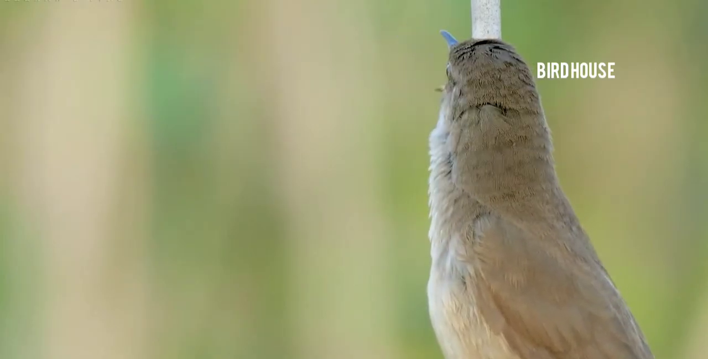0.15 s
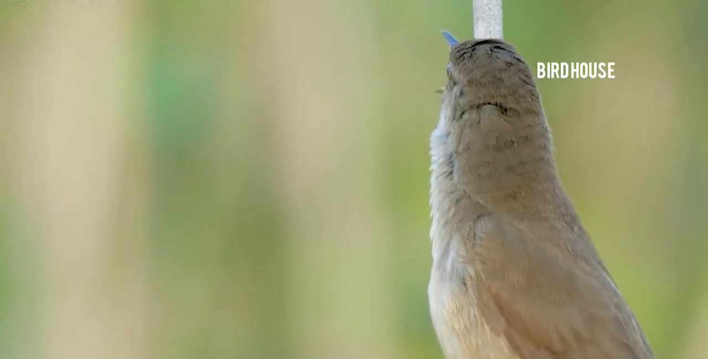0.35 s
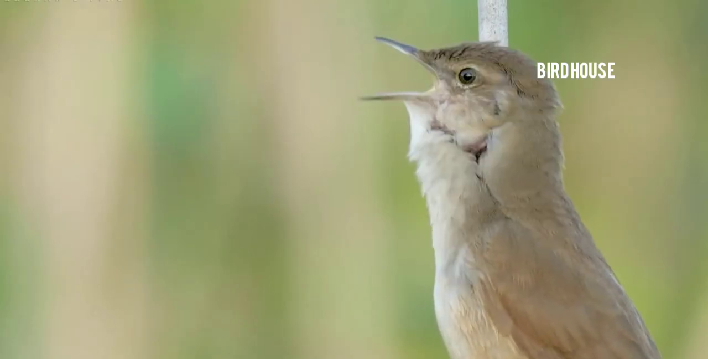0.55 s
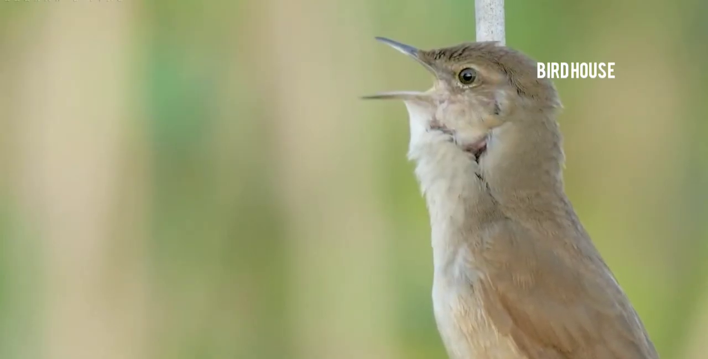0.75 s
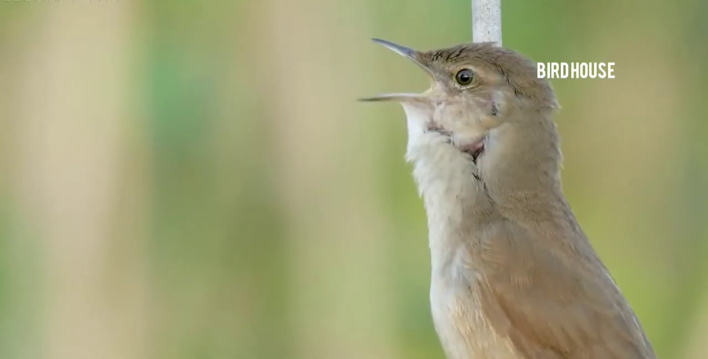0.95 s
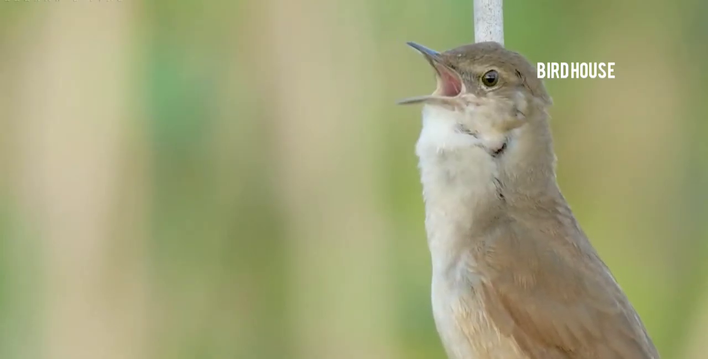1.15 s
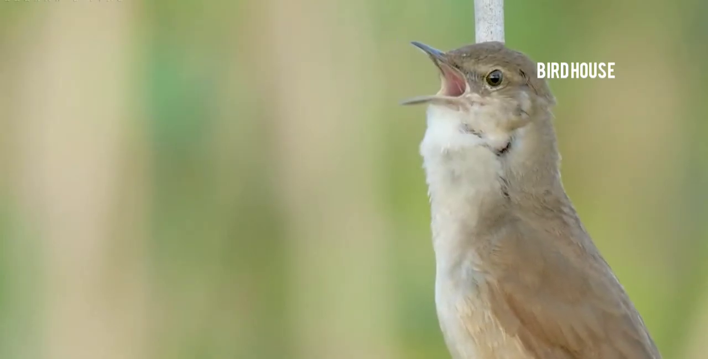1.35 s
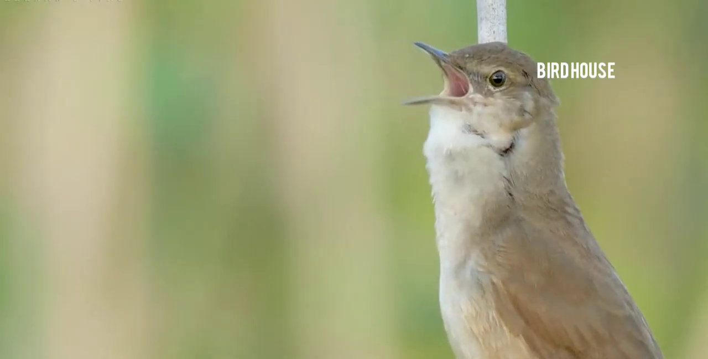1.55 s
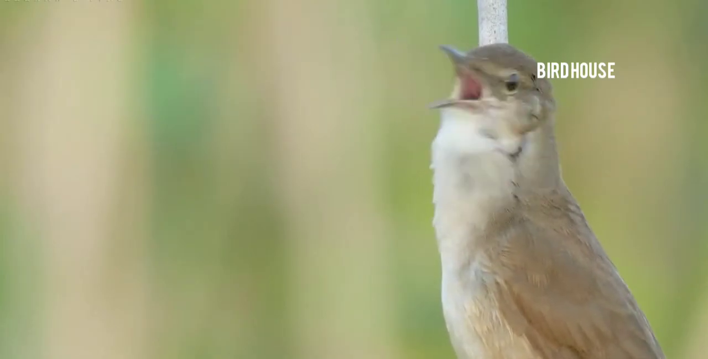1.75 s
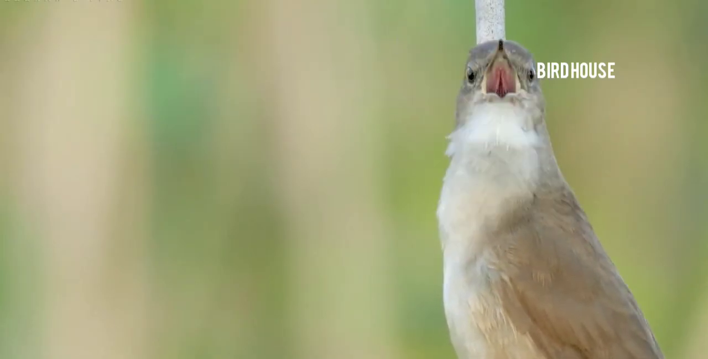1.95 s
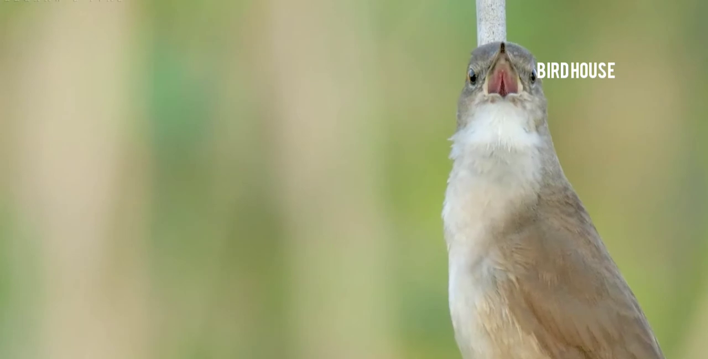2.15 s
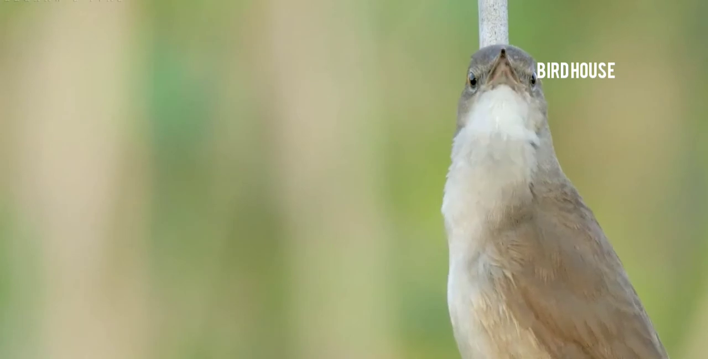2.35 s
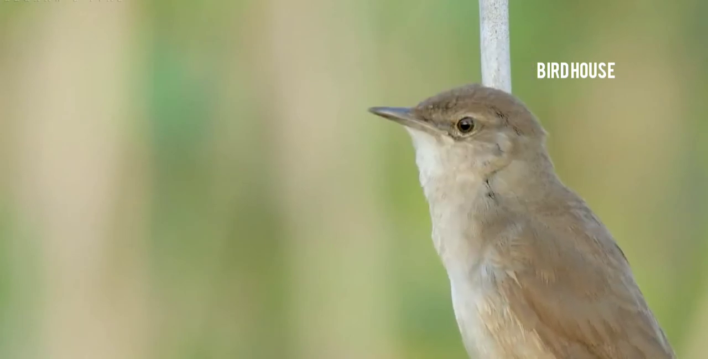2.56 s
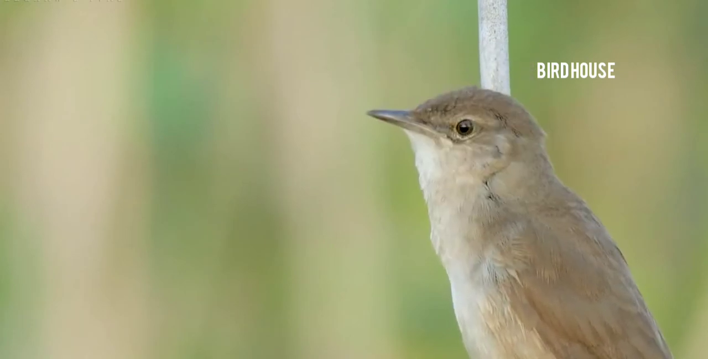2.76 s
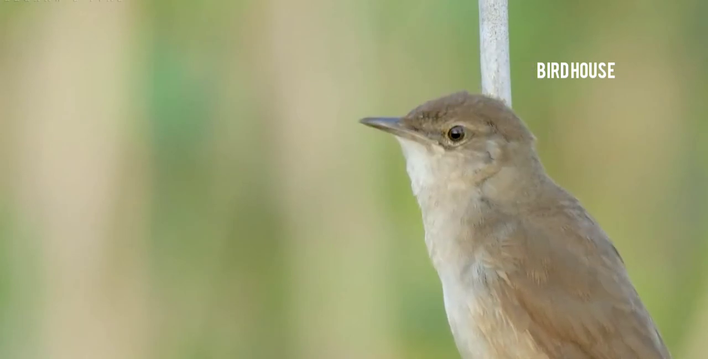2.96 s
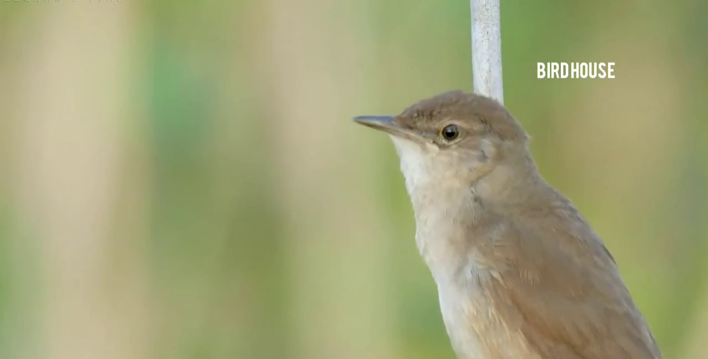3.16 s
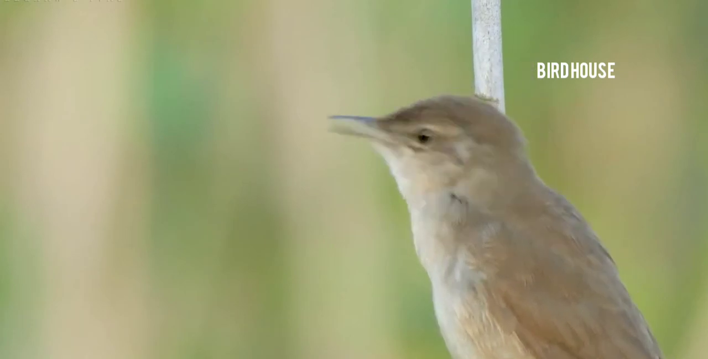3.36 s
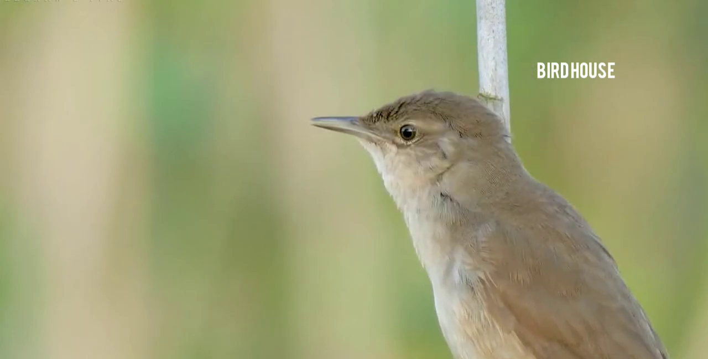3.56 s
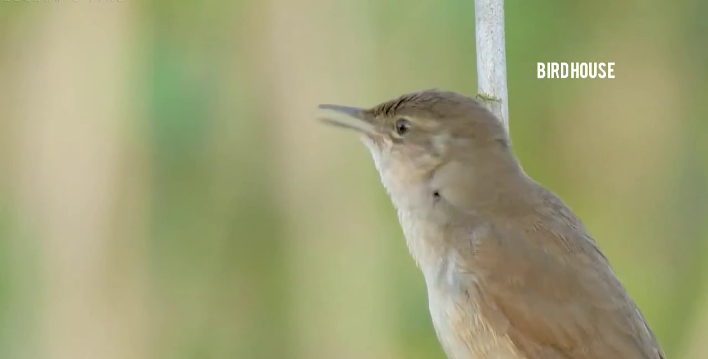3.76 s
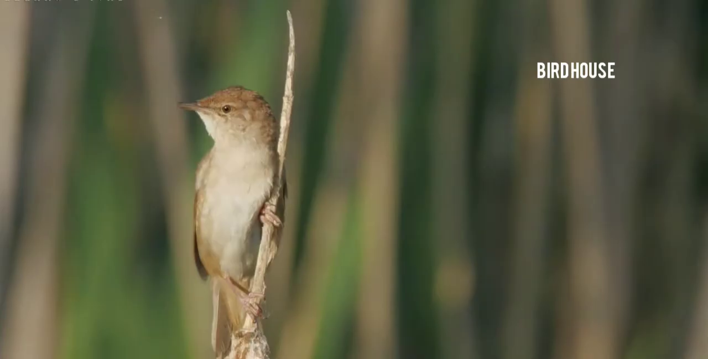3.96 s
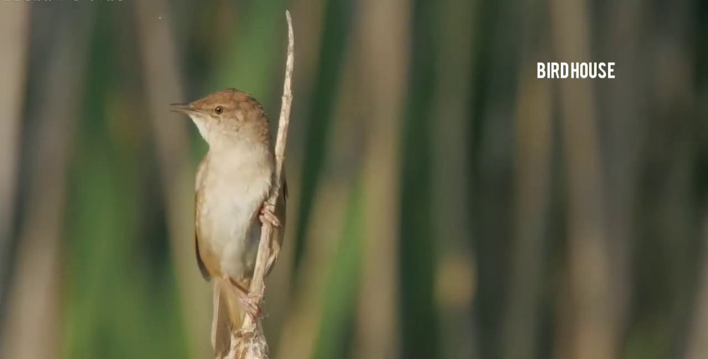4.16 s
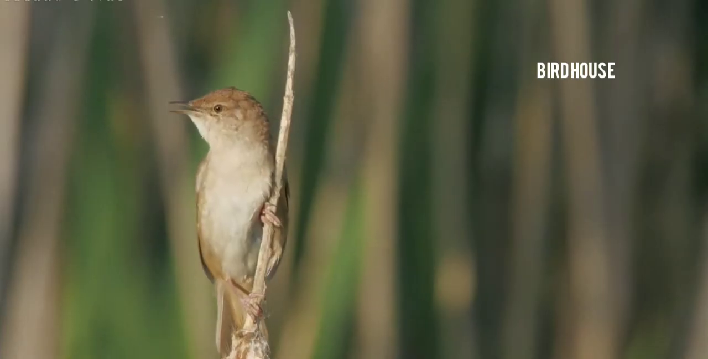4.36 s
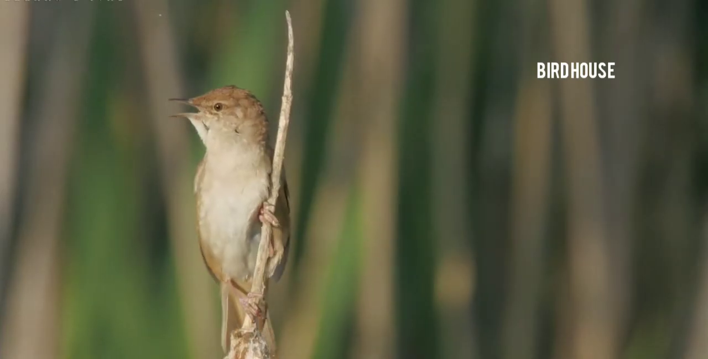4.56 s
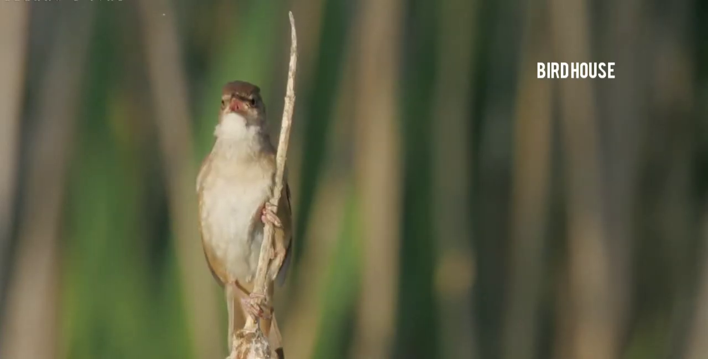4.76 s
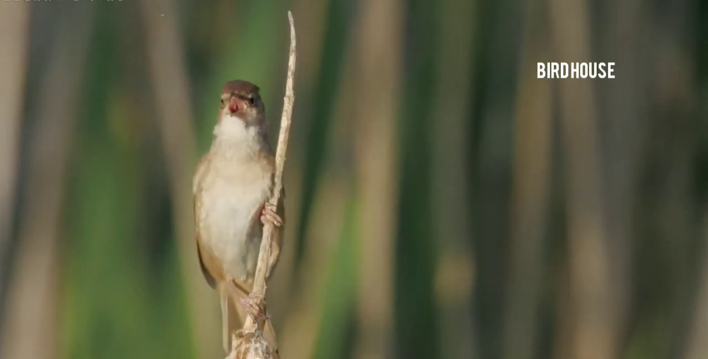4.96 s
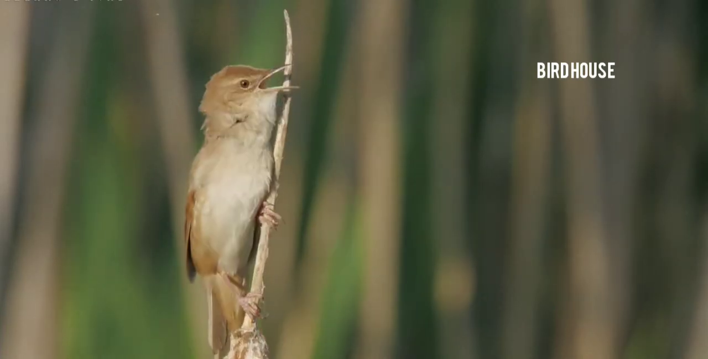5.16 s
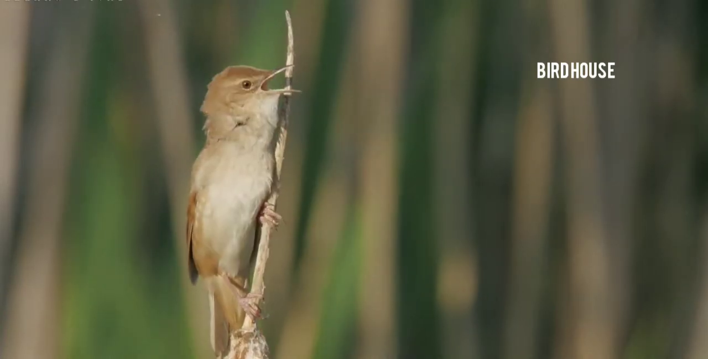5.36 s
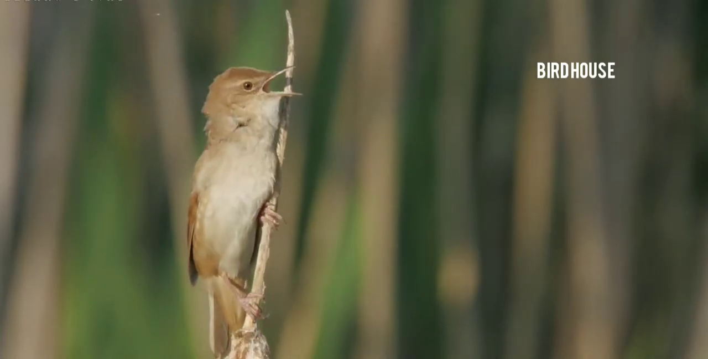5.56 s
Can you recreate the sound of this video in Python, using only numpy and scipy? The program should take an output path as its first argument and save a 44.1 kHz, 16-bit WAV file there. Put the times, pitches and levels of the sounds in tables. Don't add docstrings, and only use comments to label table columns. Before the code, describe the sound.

A small bird close to the microphone reels a steady, high, ticking trill, about fifty syllables a second, then stops at 2.4 seconds. Behind it frogs croak and chuckle; in the pause, small birds whistle and buzz and a dry stem snaps. A fainter reel then starts and swells. Outdoor marsh, soft hiss, stereo, short reedy haze.

```python
import sys
import numpy as np
from scipy import signal
from scipy.fft import rfft, irfft, next_fast_len
from scipy.io import wavfile
from scipy.ndimage import uniform_filter1d

SR = 44100
rng = np.random.default_rng(int(sys.argv[2]) if len(sys.argv) > 2 else 0)


def decibels_to_gain(level_db):
    exponent = np.asarray(level_db, float) / 20
    return 10 ** exponent


def put_to_file(sound):
    columns = np.atleast_2d(sound).T
    safe = np.clip(columns, -1, 1)
    whole_steps = np.round(safe * 32767)
    wavfile.write(sys.argv[1], SR, whole_steps.astype(np.int16))


N = 251370


def evened(x):
    return x / np.sqrt(np.mean(x ** 2) + 1e-20)


def smooth_noise(count, size):
    return evened(uniform_filter1d(rng.standard_normal(count), size))


def read(points, hz):
    f, value = np.transpose(points)
    return np.interp(np.log(hz + 1), np.log(f + 1), value)


def along(rows, t):
    s, *columns = np.transpose(rows)
    return [np.interp(t, s, c) for c in columns]


def add(mix, s, sound):
    part = mix[..., max(round(s * SR), 0):][..., :sound.shape[-1]]
    part += sound[..., :part.shape[-1]]


def placed(x, pan_db):
    return np.array([x * decibels_to_gain(pan_db / 2), x * decibels_to_gain(-pan_db / 2)])


def passed(x, order, hz, kind="bandpass", run=signal.sosfilt):
    return run(signal.butter(order, hz, kind, fs=SR, output="sos"), x)


def resonate(x, hz, width_hz):
    turn = np.exp(2j * np.pi * np.cumsum(hz * np.ones(len(x))) / SR)
    r = np.exp(-np.pi * width_hz / SR)
    return 2 * (turn * signal.lfilter([(1 - r) ** 2], [1, -2 * r, r * r], x / turn + 1e-18)).real


def blip(ms, peak_ms, start_hz, end_hz, rise_ms, fall_ms, db):
    u = ms - peak_ms
    rising = np.exp(-(u / rise_ms) ** 2)
    falling = np.exp(-(abs(u) / fall_ms) ** 1.2)
    shape = decibels_to_gain(db) * np.where(u < 0, rising, falling)
    hz = start_hz + (end_hz - start_hz) / (1 + np.exp(-np.clip(0.83 * u / rise_ms, -30, 30)))
    return 2 * np.pi * np.cumsum(hz) / SR, shape


def reeds(x, t60_s, first_ms):
    taps = np.zeros((2, SR // 2))
    at = np.arange(0, SR // 2 - 20, 20) + rng.integers(0, 20, (2, SR // 40))
    np.put_along_axis(taps, at, rng.choice([-1., 1.], at.shape), 1)
    t = np.arange(SR // 2) / SR
    taps *= decibels_to_gain(-60 * t / t60_s) * np.clip(t * 1000 / first_ms, 0, 1)
    return signal.fftconvolve(x, taps / np.linalg.norm(taps[0]), axes=1)[:, :N]


# (time [s], level [dB])
MURMUR = [(0, -43.5), (.3, -71), (.55, -40.5), (1.2, -42.5), (1.95, -54), (2.3, -34.5), (3.4, -55),
          (3.9, -45.5), (4.55, -60.5), (5.35, -39), (5.7, -49)]
SWELL_DB_PER_S, CUT_DB_PER_S = 192, 388
LOW_MURMUR_DB = -10.5


def calls_db(rows, t, murmur_db):
    start, length, level = np.array(rows)[:, :3, None].swapaxes(0, 1)
    early, late = start - t, t - start - length
    db = level - SWELL_DB_PER_S * np.maximum(early, 0) - CUT_DB_PER_S * np.maximum(late, 0)
    return np.maximum(db.max(0), along(MURMUR, t)[0] + murmur_db)


# (frequency [Hz], density [dB])
AIR_SPECTRUM = [(18, -64), (30, -62), (81, -29), (100, -26), (130, -26), (200, -27), (352, -26.5),
                (521, -18), (1030, -11), (1300, -5), (2200, 0.5), (3260, -4.5), (5500, -11), (11000, -19),
                (15000, -21)]
# (frequency [Hz], correlation [0-1])
AIR_LIKENESS = [(60, 1), (180, 0.92), (550, 1), (1650, 0.7), (4970, 0.71), (10000, 0.93), (11500, 0.39),
                (15000, 0.25)]
# (time [s], level [dB])
RUSH_LULL = [(0, 1.5), (3.65, 1.5), (3.75, -6), (5.3, -0.5), (5.7, 1)]
AIR_DB, RUSH_SHARE = -37, 0.33
TOP_LEFT_DB = 2


def air():
    frames, hz = N // 256 + 5, np.fft.rfftfreq(1024, 1 / SR)
    f = hz[:, None]
    a, b, c, d, patches = rng.standard_normal((frames, 513, 5)).T
    patches = evened(uniform_filter1d(uniform_filter1d(patches, 12, 0), 10, 1))
    patch_db = (1.1 + 1.5 / (1 + (f / 4000) ** 4)) * patches
    same, left = np.clip(read(AIR_LIKENESS, hz), -1, 1)[:, None], a + 1j * b
    z = np.array([left, same * left + np.sqrt(1 - same ** 2) * (c + 1j * d)])
    z *= decibels_to_gain(read(AIR_SPECTRUM, hz)[:, None] + patch_db)
    level = decibels_to_gain(AIR_DB - 11.5) / np.std(signal.istft(z, nperseg=1024, noverlap=768)[1])

    t = np.arange(frames) * 256 / SR
    croak_db = calls_db(CROAK_LOW, t - .012, LOW_MURMUR_DB)
    swell_db = RUSH_SHARE * (croak_db + 54.5) + along(RUSH_LULL, t)[0]
    low = 1 / (1 + (f / 1100) ** 4) / (1 + (360 / (f + 1)) ** 8)
    z *= decibels_to_gain(low * swell_db)
    z *= decibels_to_gain(np.multiply.outer([.5, -.5], TOP_LEFT_DB * (hz > 11000)))[..., None]
    return level * signal.istft(z, nperseg=1024, noverlap=768)[1][:, :N]


def note(s, length_s, start_hz, middle_hz, end_hz, db, warble=0, per_s=0):
    u = np.linspace(0, 1, max(round(length_s * SR), 99))
    hz = np.polyval(np.polyfit([0, .5, 1], [start_hz, middle_hz, end_hz], 2), u)
    beat = np.cos(2 * np.pi * per_s * length_s * u)
    waver = smooth_noise(N // 8, 200)[:len(u)]
    tone = np.sin(2 * np.pi * np.cumsum(hz * (1 + warble * beat + 0.006 * waver)) / SR)
    chop = 1 + np.sign(warble) * .6 * beat
    return s, decibels_to_gain(db + 8 + 1.2 * waver) * tone * chop * signal.windows.tukey(len(u), .4)


# (time [s], level [dB])
FLOCK_LEVEL = [(0, -53), (2.4, -50), (2.75, -48.5), (2.85, -52), (3.0, -49.5), (3.5, -49.5), (3.75, -54),
               (3.97, -50.5), (4.07, -59), (4.3, -58), (4.37, -54), (4.5, -59), (5.7, -56)]


def flock():
    out, ms = np.zeros((2, N)), np.arange(600) * 1000 / SR
    for s, length, height, slide, side, size in rng.random((1500, 6)):
        hz = 2500 + 2400 * height
        end_hz = hz * (1 + .3 * (slide - .55))
        turn, shape = blip(ms, 5, hz, end_hz, .7 + 2 * length, 1.2 + 6 * length, 3 * size)
        add(out, s * N / SR, placed(shape * np.sin(turn), 8 * (side - .5)))
    out = .4 * out + reeds(out, t60_s=.3, first_ms=2)
    return decibels_to_gain(along(FLOCK_LEVEL, np.arange(N) / SR)[0]) * evened(out)


# (start [s], length [s], start pitch [Hz], end pitch [Hz], level [dB])
LATE_WHISTLES = [(2.691, 0.32, 4000, 3964, -56), (2.696, 0.016, 3550, 3200, -49),
                 (2.844, 0.011, 3550, 3320, -44), (3.512, 0.04, 2980, 3500, -49),
                 (3.567, 0.029, 3550, 3904, -43.5), (3.639, 0.037, 3070, 2910, -45),
                 (3.844, 0.057, 3330, 3730, -48.5), (4.165, .062, 3690, 3800, -42),
                 (4.215, .048, 3750, 4800, -48), (4.23, .12, 3720, 3780, -67),
                 (4.315, .035, 3740, 3800, -61), (4.27, .068, 2840, 2970, -57),
                 (4.17, 0.17, 2790, 2880, -57), (4.345, 0.033, 2950, 3060, -54),
                 (4.35, .03, 3200, 4030, -58), (4.27, .16, 525, 522, -82), (4.405, .027, 4670, 4480, -57),
                 (4.5, 0.19, 2780, 2930, -61), (5.6, 0.098, 523, 523, -79)]
# (start [s], length [s], start pitch [Hz], end pitch [Hz], level [dB])
EARLY_WHISTLES = [(3.094, .008, 3750, 3300, -50), (3.545, 0.06, 3450, 4600, -55),
                  (3.6, .05, 4650, 4800, -58), (3.612, 0.03, 4200, 3150, -46),
                  (3.69, 0.063, 4500, 2770, -56), (3.725, .061, 2720, 2625, -51),
                  (3.892, .028, 5500, 5000, -57), (3.96, .043, 4500, 2900, -57),
                  (3.985, .03, 4800, 4400, -54), (4.04, 0.057, 3050, 2570, -50.5),
                  (4.455, 0.04, 4150, 3740, -55), (4.139, 0.041, 3810, 3690, -44),
                  (3.92, 0.041, 3300, 3550, -60), (3.9, .02, 3250, 3300, -56),
                  (2.55, 0.078, 5250, 5200, -68), (3.8, .02, 5080, 5030, -57)]
# (start [s], length [s], start pitch [Hz], end pitch [Hz], level [dB])
DROP_WHISTLES = [(3.305, .07, 7150, 4700, -63), (3.878, .06, 7150, 4900, -61),
                 (2.912, .012, 5550, 4500, -60), (2.93, .013, 5500, 4400, -59),
                 (2.947, .014, 5500, 4400, -61), (2.897, .012, 5200, 4300, -61),
                 (2.73, .014, 5400, 4500, -59), (2.75, .014, 5400, 4500, -59)]
LATE_SHARE, EARLY_SHARE, DROP_SHARE = 0.4, .65, .2
# (start [s], length [s], pitch [Hz], level [dB])
STEADY_BUZZES = [
    (3.106, .047, 5020, -62),
    (3.202, .067, 5120, -59),
    (3.409, .059, 4700, -57),
    (4.588, .032, 1000, -64.5),
    (4.632, .025, 1235, -56),
    (4.8, .08, 5930, -62),
]
# (start [s], buzz length [s], level [dB])
BUZZ_PHRASES = [
    (0.257, 0.065, -55),
    (.503, 0.036, -56),
    (2.632, 0.075, -59),
    (2.855, 0.04, -60),
]
BUZZ_HZ, SLIDE_HZ, SLIDE_S, SLIDE_DB = 6100, (5570, 4620), .062, -8
# (start [s], length [s], start pitch [Hz], middle pitch [Hz], end pitch [Hz], level [dB])
ROUGH_CALLS = [(4.25, .07, 4700, 4870, 4650, -51), (4.235, .085, 4050, 4450, 4500, -54),
               (4.25, .06, 4000, 4150, 4300, -59), (4.325, .03, 4750, 4800, 4800, -60),
               (.335, .09, 930, 1150, 1400, -65), (1.285, .05, 1080, 1050, 1000, -61),
               (1.43, .08, 980, 1150, 1300, -66), (1.5, .08, 1200, 1250, 1330, -52),
               (3.0, .03, 4100, 4250, 4150, -54), (3.43, .04, 4900, 4600, 4250, -53),
               (3.455, .015, 4300, 4200, 4100, -52), (3.07, .05, 4750, 4950, 5050, -58),
               (2.41, .11, 4500, 4450, 4450, -56), (2.45, .07, 2950, 2900, 2900, -54),
               (2.52, .16, 4400, 4420, 4450, -62), (2.99, .06, 3550, 3600, 3550, -58),
               (3.07, .06, 4450, 4350, 4200, -58), (3.69, .05, 3300, 3100, 2900, -56),
               (3.97, .06, 3400, 3050, 2800, -57), (4.34, .04, 4400, 4000, 3500, -58)]


def neighbours():
    out = np.zeros((2, N))
    whistles = (LATE_WHISTLES, LATE_SHARE), (EARLY_WHISTLES, EARLY_SHARE), (DROP_WHISTLES, DROP_SHARE)
    for rows, share in whistles:
        for s, length, f0, f1, db in rows:
            start, sound = note(s, length, f0, f0 + share * (f1 - f0), f1, db)
            add(out, start, placed(sound, 1.0))

    buzzes = [(s, length, hz, hz, db) for s, length, hz, db in STEADY_BUZZES]
    for s, length, db in BUZZ_PHRASES:
        buzzes.append((s, length, BUZZ_HZ, BUZZ_HZ, db))
        buzzes.append((s + length, SLIDE_S, *SLIDE_HZ, db + SLIDE_DB))
    for s, length, f0, f1, db in buzzes:
        start, sound = note(s, length, f0, (f0 + f1) / 2, f1, db, warble=.012, per_s=72)
        add(out, start, placed(sound, 1.5))

    for row in ROUGH_CALLS:
        start, sound = note(*row, warble=.018, per_s=112)
        add(out, start, placed(sound, -.5))
    return out + flock()


# (time [s], peak [dB])
STEM_SNAPS = [
    (2.581, -32),
    (5.2074, -39),
    (5.322, -47),
    (5.51, -45),
    (5.688, -45),
]


def snaps():
    out, t = np.zeros(N), np.arange(400) / SR
    for s, db in STEM_SNAPS:
        add(out, s, decibels_to_gain(db - 60 * t / .012) * np.diff(rng.standard_normal(402), 2) / 3)
    return placed(passed(out, 8, 15300, "lowpass"), 1.5)


def croak(level_db, hz, width_hz, per_s, uneven, rough):
    turns = np.cumsum(per_s * (1 + uneven * smooth_noise(N, 900))) / SR
    size = decibels_to_gain(4.3 * rng.standard_normal(N))
    pulses = np.diff(np.floor(turns), prepend=0) * size
    puffs = evened(resonate(rng.standard_normal(N), hz, width_hz))
    drive = (1 - rough) * evened(resonate(pulses, hz, width_hz)) + rough * puffs
    return decibels_to_gain(level_db) * drive / np.sqrt(uniform_filter1d(drive ** 2, 5000) + 1e-9)


# (time [s], bursts so far [count])
BURST_PACE = [(.01, 0), (.755, 10), (1.19, 16), (1.46, 20), (1.62, 22), (2.05, 28), (2.42, 33), (2.655, 36),
              (2.755, 37), (3.03, 40), (3.49, 45)]
# (time [s], level [dB], pitch [Hz])
BURST_PULSES = [(0, -27.5, 2750), (.75, -40, 2780), (1.1, -36.5, 2220), (1.45, -32, 2310), (2.0, -27, 2346),
                (2.4, -28, 2280), (2.6, -29, 2240), (2.75, -40, 2030), (3.0, -34.5, 2390), (3.5, -36, 2130)]
# (time [s], peak [dB], pitch [Hz])
LONE_PULSES = [(2.582, -24.5, 2210), (3.461, -27, 1980), (3.489, -24, 2060), (3.541, -24, 2020),
               (3.608, -32.5, 2070), (3.905, -34, 2320), (2.654, -27, 2100), (3.016, -30, 2280),
               (4.039, -28, 1740), (4.051, -31, 1780), (4.062, -31, 1760), (4.38, -41, 2550),
               (3.765, -39, 1900), (4.425, -42, 3900), (4.124, -31.5, 2070), (4.4523, -33, 2600),
               (4.532, -40, 2260), (3.99, -39, 2950), (4.016, -40, 2700), (4.567, -44, 2950),
               (3.038, -38, 2700), (3.058, -38, 2750)]
PULSE_GAP_S, PULSES = .012, 3


def chuckle():
    s, count = np.transpose(BURST_PACE)
    hard, ms, k = np.zeros(N), np.arange(600) * 1000 / SR, np.arange(count[-1] + 1)
    luck = rng.standard_normal((len(k), PULSES, 3))
    middle = np.interp(k, count, s)[:, None]
    burst_db, burst_hz = along(BURST_PULSES, middle)
    order = np.arange(PULSES)
    start = middle - PULSE_GAP_S - .003 + PULSE_GAP_S * order + 0.0022 * luck[..., 0]
    level = burst_db + 2.12 * luck[..., 1] - 2.0 * abs(order - 1)
    pitch = burst_hz * (1 + 0.0082 * luck[..., 2])
    for s, db, hz in np.r_[np.reshape([start, level, pitch], (3, -1)).T, LONE_PULSES]:
        turn, shape = blip(ms, 1.6, hz * .98, hz, 1.1, 3, db + .5)
        add(hard, s, shape * np.sin(turn))
    return hard


# (start [s], length [s], level [dB], throat pitch [Hz])
CROAK_LOW = [(0.434, 0.043, -37.5, 1424), (0.717, 0.089, -38, 1500), (0.853, 0.048, -33, 1500),
             (1.002, 0.024, -37, 1480), (1.067, 0.064, -44.5, 1560), (1.544, 0.052, -39.5, 1480),
             (1.674, 0.13, -36, 1447), (2.36, 0.072, -41, 1530), (2.774, 0.085, -35, 1476),
             (3.172, 0.49, -42, 1600), (3.405, 0.17, -36.5, 1470), (3.607, 0.031, -40, 1396),
             (4.02, 0.006, -45.5, 1710), (5.08, 0.2, -48.5, 1255), (5.308, 0.094, -44.5, 1280),
             (5.447, .01, -55, 1410), (5.628, 0.066, -37.5, 1720)]
# (start [s], length [s], level [dB])
CROAK_MID = [(.59, .1, -34), (.77, 0.066, -34), (1.17, 0.019, -37), (2.25, 0.14, -34.5),
             (2.4, 0.026, -28.5), (2.64, .03, -39), (2.72, 0.026, -30.5), (3.36, 0.087, -34),
             (3.46, 0.082, -31), (4.05, 0.02, -49), (4.12, 0.016, -41.5), (4.84, 0.015, -43),
             (5.16, .02, -42.5), (5.29, 0.055, -36.5), (5.37, .02, -46), (5.58, .13, -38)]
# (time [s], pitch [Hz])
MID_THROAT = [(0, 1964), (4.85, 1989), (5.1, 1701), (5.28, 1600), (5.37, 1799), (5.45, 1620), (5.58, 1834),
              (5.7, 1845)]
# (time [s], level [dB], throat pitch [Hz])
CROAK_HIGH = [(0.0, -46.5, 3020), (0.46, -39.5, 2560), (1.03, -49, 2540), (1.4, -39.5, 2610),
              (2.28, -43, 2630), (2.92, -49, 2070), (3.46, -40, 1950), (3.73, -61, 2780), (4.87, -73, 2320),
              (5.7, -42, 2320)]
# (time [s], left-right [dB])
POND_PAN = [(0, -2), (2.3, -1.5), (2.6, -2.5), (4.6, 1), (5.1, 6), (5.7, 7)]
# (time [s], left-right [dB])
HIGH_PAN = [(0, -1.5), (.7, -1.5), (2.3, -4.5), (2.6, 1), (5.7, 2)]


def frogs():
    t = np.arange(N) / SR
    s, length, _, hz = np.transpose(CROAK_LOW)
    low_hz, mid_hz = np.interp(t, s + length / 2, hz), along(MID_THROAT, t)[0]
    low = croak(calls_db(CROAK_LOW, t, LOW_MURMUR_DB), low_hz, 200, per_s=80, uneven=.35, rough=.35)
    mid = croak(calls_db(CROAK_MID, t, 0), mid_hz, 300, per_s=130, uneven=.25, rough=0.59)
    high = croak(*along(CROAK_HIGH, t), 1070, per_s=140, uneven=0.37, rough=0.5)
    hard = chuckle()
    throb = uniform_filter1d(abs(hard), 900) / (uniform_filter1d(abs(hard), 6000) + 1e-4)
    high *= .7 + .3 * throb
    pond_db, high_db = along(POND_PAN, t)[0], along(HIGH_PAN, t)[0]
    pond = placed(low * decibels_to_gain(-5.5), pond_db - 1.0)
    pond += placed(mid * decibels_to_gain(-7.0), pond_db - .76)
    pond += placed(high * decibels_to_gain(-1.36) + hard, high_db)
    return passed(pond, 4, [1120, 3100])


# (peak [ms], start pitch [Hz], end pitch [Hz], rise [ms], fall [ms], level [dB])
TICK = [
    (1.0, 5300, 6200, .3, .5, 0),
    (1.9, 6400, 6850, .5, 1.7, -2),
    (4.6, 5900, 5450, .7, 2.2, -11),
    (8.3, 6500, 6800, 1.1, 1.4, -13),
]
# (tick [dB], octave [dB], top overtones [dB])
FACING_DB = (10.5, 9, 6)
# (tick [dB], octave [dB], top overtones [dB])
SHUT_DB = (28, 22, 6)
SHUT_POWER = 9.5
SHUT_TICK_HZ = 5700
CLICK_MS, CLICK_DB, CLICK_SWAY_DB = 1.9, 21, 3.5


def syllable(blips, luck, opening, facing, away_db, slip_ms, sway_db, detune):
    ms = np.arange(950) * 1000 / SR
    rasp = np.cumsum(.17 * rng.standard_normal(len(ms)))
    out, shut = np.zeros((4, len(ms))), 1 - np.clip(opening, 0, 1)
    gather = .85 * shut ** 2
    posture_db = np.multiply(FACING_DB, facing) + np.multiply(SHUT_DB, shut ** SHUT_POWER)
    tick_db, octave_db, top_db = away_db + posture_db

    for k, ((peak, f0, f1, rise, fall, own_db), (a, b, c)) in enumerate(zip(blips + TICK, luck)):
        peak_ms = peak + slip_ms * a
        if k >= len(blips):
            bend = 1 + 2 * detune * c
            f0, f1 = (f + gather * (SHUT_TICK_HZ - f) for f in (f0, f1))
            db = own_db + tick_db + 4.5 + sway_db * b
            turn, shape = blip(ms, peak_ms, f0 * bend, f1 * bend, rise, fall, db)
            sidebands = 1 + 1.45 * np.cos(2 * np.pi * 0.777 * ms)
            out[1] += shape * np.sin(turn)
            out[3] += shape * decibels_to_gain(top_db - tick_db - 4.5) * np.sin(2 * turn + rasp) * sidebands
            continue
        lift_db = shut * (5 - 30 * np.clip((peak - blips[0][0]) / 6, 0, 1) ** 1.4)
        bend = (1 + detune * c) * (1 - 0.0051 * shut + 0.17 * shut * (k == 2))
        end_hz = f1 - gather * (k == 0) * (f1 - f0)
        db = own_db + lift_db + sway_db * b
        turn, shape = blip(ms, peak_ms, f0 * bend, end_hz * bend, rise, fall, db)
        rising = f1 > f0
        octave = decibels_to_gain(octave_db + 1.5 + 7.7 * rising) * np.sin(2 * turn)
        third = decibels_to_gain(top_db + 1.5 + 1.3 * rising) * np.sin(3 * turn + rasp)
        out[0] += shape * np.sin(turn)
        out[2] += shape * shape ** 0.38 * octave
        out[3] += shape * shape ** 0.39 * third

    click_db = away_db[0] + CLICK_DB + CLICK_SWAY_DB * luck[-1, 0]
    click = np.gradient(uniform_filter1d(rng.standard_normal(len(ms)), size=3))
    out[1] += min(.08 + 2 * shut, 1) * decibels_to_gain(click_db) * np.exp(-abs(ms - CLICK_MS) / .25) * click
    return out


WOBBLE_MS = .2


def reel(pace, rows, bill, blips, away_db, slip_ms, sway_db, detune, tract_hz, top_hz):
    s, count = np.transpose(pace)
    starts = np.interp(np.arange(count[-1] + 1), count, s)
    if s[0] < starts[2] - starts[0]:
        starts = np.r_[2 * starts[0] - starts[1], starts]
    starts = starts + WOBBLE_MS / 1000 * smooth_noise(len(starts), 5)
    out = np.zeros((2, 4, N + SR))
    chance = rng.standard_normal((len(starts), len(blips) + len(TICK), 3))
    controls = np.transpose(along(rows, starts) + along(bill, starts))
    for start, luck, (db, pan_db, opening, facing) in zip(starts, chance, controls):
        sound = syllable(blips, luck, opening, facing, away_db, slip_ms, sway_db, detune)
        add(out, start + 1, placed(sound * decibels_to_gain(db + 12.5), pan_db))
    throat, tick, octave, top = out[..., SR:].swapaxes(0, 1)
    throat = passed(throat, 5, tract_hz, run=signal.sosfiltfilt)
    octave = .3 * octave + passed(octave, 2, [7750, 8250])
    return throat + tick + octave + passed(top, 3, top_hz)


def coloured(x, rows):
    size = next_fast_len(N + SR // 4)
    hz = np.fft.rfftfreq(size, 1 / SR)
    ring = 1
    for f, width, left, right in rows:
        ring = ring + np.array([[left], [right]]) / (1 + 2j * (hz - f) / width) ** 2
    return irfft(rfft(x, size) * ring, size)[:, :N]


# (time [s], syllables so far [count])
PACE_NEAR = [(0.0178, 0), (0.6164, 32), (1.2165, 64), (1.9671, 104), (2.2692, 120), (2.4043, 127)]
PACE_FAR = [(4.6267, 0), (4.7675, 8), (5.0559, 24), (5.3525, 40), (5.6482, 56), (5.6859, 58)]
# (time [s], level [dB], left-right [dB])
EFFORT_NEAR = [
    (0.0, -21.5, -0.5),
    (0.09, -25, -0.5),
    (0.5, -23.5, -1),
    (0.63, -25.5, -0.5),
    (2.16, -23.5, -1),
    (2.369, -25.5, -0.5),
    (2.41, -36, 0),
    (2.42, -38, 5),
]
EFFORT_FAR = [
    (4.62, -57, 1.0),
    (4.626, -47, 0.58),
    (4.72, -45.5, 0.88),
    (4.81, -37.5, 0),
    (4.95, -34, -.5),
    (5.13, -29, -0.92),
    (5.642, -29.5, 0.18),
    (5.7, -24, -0.58),
]
# (time [s], bill opening [0-1], head facing [0-1])
BILL_NEAR = [(0, 0.89, 0), (.5, 0.86, 0.3), (.75, 0.89, 0.82), (1.5, 0.91, 0.83), (2.4, 0.97, 0.72)]
BILL_FAR = [(4.62, 0.022, 0.43), (4.72, 0.046, 0.27), (4.8, 0.19, 0.42), (4.97, 0.5, 0), (5.15, 0.81, 0.59),
            (5.4, 0.89, 0.27), (5.55, 0.98, 0.64), (5.7, 1, 0.81)]
# (peak [ms], start pitch [Hz], end pitch [Hz], rise [ms], fall [ms], level [dB])
BLIPS_NEAR = [
    (2.3, 3500, 3950, .6, .7, -6.5),
    (3.5, 4300, 4480, .55, .9, -1.5),
    (5.6, 4400, 4250, .5, 1, -9),
    (8.4, 4000, 4150, .5, 1.2, -4),
    (11.1, 3960, 3880, .75, 3.4, -1.5),
    (16.6, 3900, 3930, 1, 5, -10),
]
BLIPS_FAR = [
    (2.0, 3400, 4600, .55, .8, 0),
    (4.8, 4250, 4420, .45, .8, -4),
    (8.1, 3950, 3960, .5, 1.6, 0),
    (10.8, 3900, 3960, .7, 2.6, -1.5),
    (3.3, 4550, 4350, .35, .6, -5),
    (6.4, 4400, 4450, .4, .6, -10),
]
# (pitch [Hz], width [Hz], left boost or dip [ratio], right boost or dip
COLOUR_NEAR = [(3530, 150, .3, .2), (3760, 200, .3, 0), (3880, 120, .4, .4), (4020, 110, -.6, -.15),
               (4255, 130, .8, .9), (4530, 120, .3, .5), (5050, 250, -.5, -.4), (6000, 900, .4, .4),
               (7900, 400, -.2, -.2), (10200, 2500, 1.2, 1.2)]
COLOUR_FAR = [(3550, 300, .6, .3), (3920, 130, .9, .9), (4070, 130, -.8, -.55), (4260, 160, .2, .3),
              (4460, 100, -.5, -.5), (4650, 180, 1, 1), (5880, 250, 1.2, 1), (6950, 300, -.7, -.7),
              (7400, 400, 1, 1), (8000, 400, -.6, -.6)]


def scene():
    near_away_db, far_away_db = (-31.5, -34.5, -38.5), (-33.0, -45.5, -41.0)
    near = reel(PACE_NEAR, EFFORT_NEAR, BILL_NEAR, BLIPS_NEAR, near_away_db, slip_ms=.1, sway_db=1.6,
                detune=.003, tract_hz=(3200, 4950), top_hz=(11700, 15200))
    far = reel(PACE_FAR, EFFORT_FAR, BILL_FAR, BLIPS_FAR, far_away_db, slip_ms=.1, sway_db=1.8,
               detune=.005, tract_hz=(3050, 5150), top_hz=(11600, 13600))
    near, far = coloured(near, COLOUR_NEAR), coloured(far, COLOUR_FAR)
    birds = neighbours()
    others = frogs() + birds

    haze = reeds(near * decibels_to_gain(-10) + far * decibels_to_gain(-10.5), t60_s=.42, first_ms=4)
    haze += decibels_to_gain(-3.5) * reeds(others - .35 * birds, t60_s=.33, first_ms=8)
    treble = passed(near + far, 4, 5400, "highpass", signal.sosfiltfilt)
    top = passed(treble, 4, 10800, "highpass", signal.sosfiltfilt)
    wet = np.where(np.arange(N) < N * .6, .25, .9)
    lean = placed(np.ones(1), 2 * TOP_LEFT_DB)
    haze += reeds(wet * treble + lean * top, t60_s=.09, first_ms=1.5)
    haze -= .2 * wet * treble + .6 * top
    return near + far + others + haze + snaps() + air()


def roll_off(x):
    return signal.sosfilt(signal.butter(12, 15840, fs=SR, output="sos"), x)


def record(dry):
    return roll_off(dry)


dry = scene()
out = record(dry)
put_to_file(out)
```